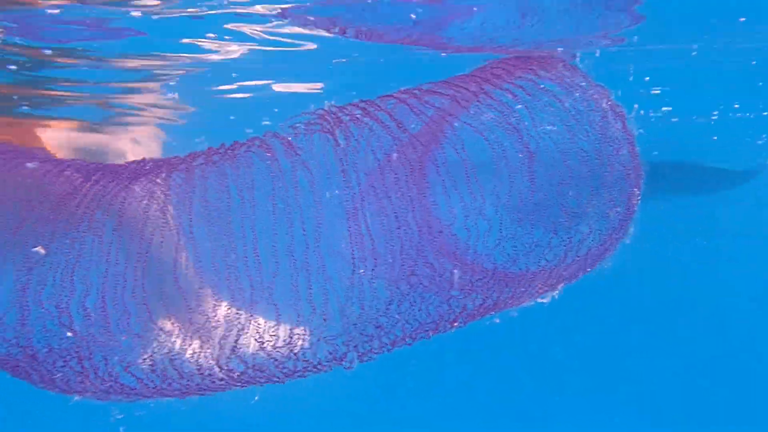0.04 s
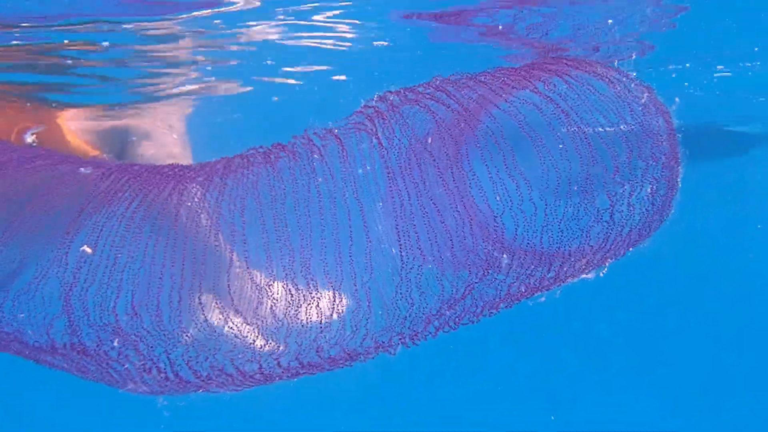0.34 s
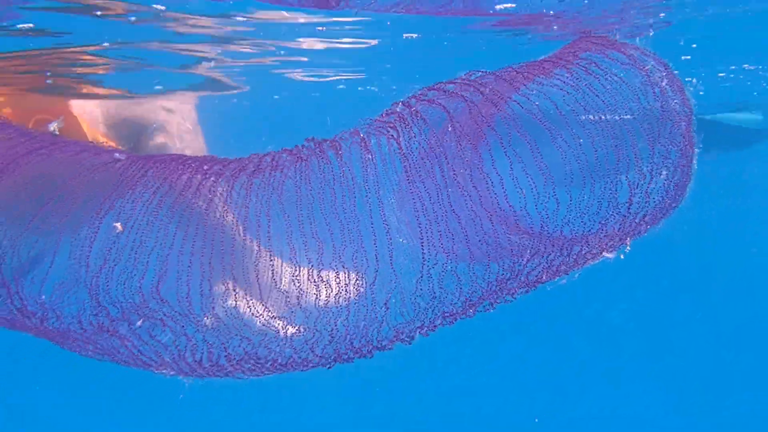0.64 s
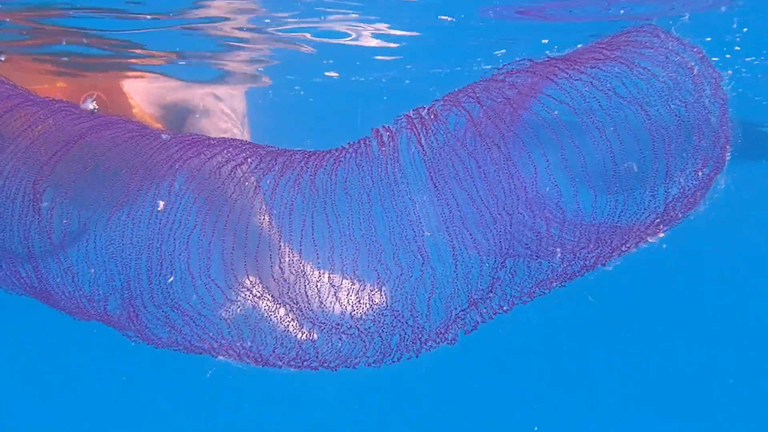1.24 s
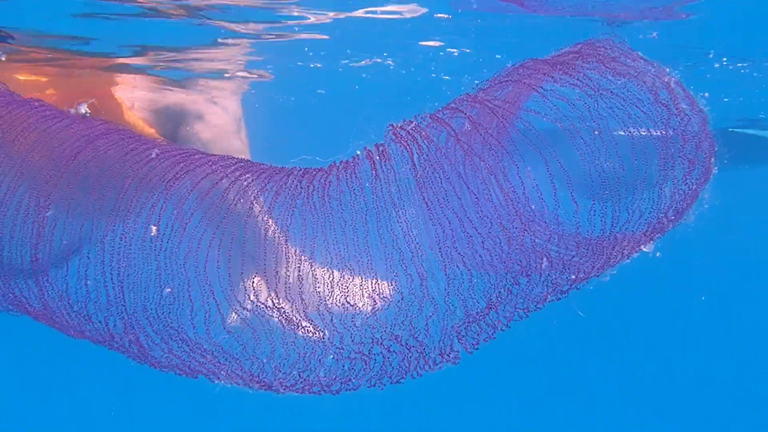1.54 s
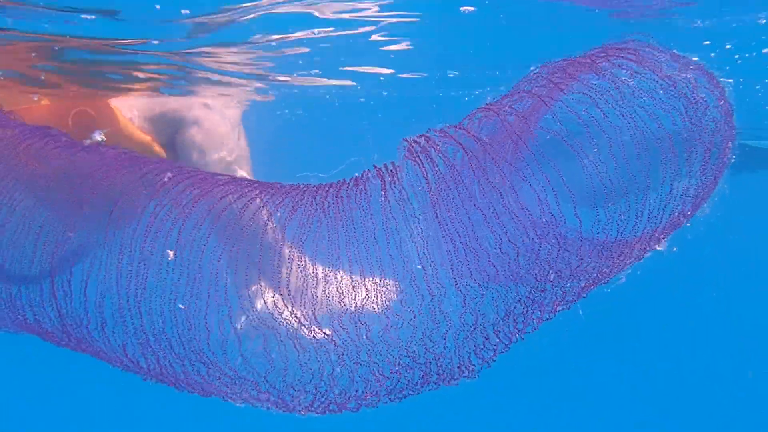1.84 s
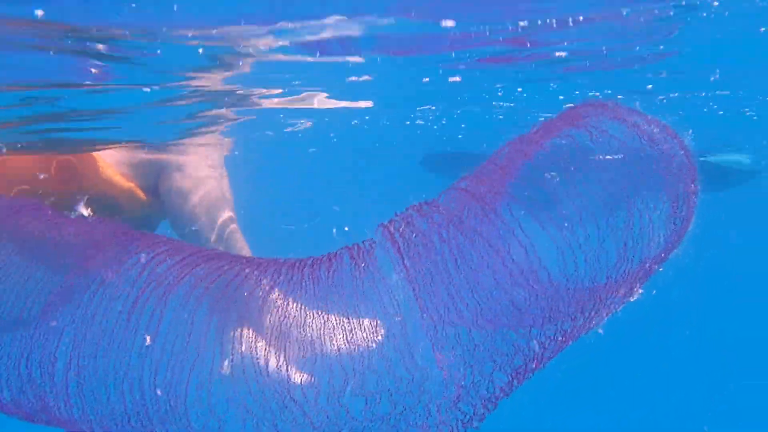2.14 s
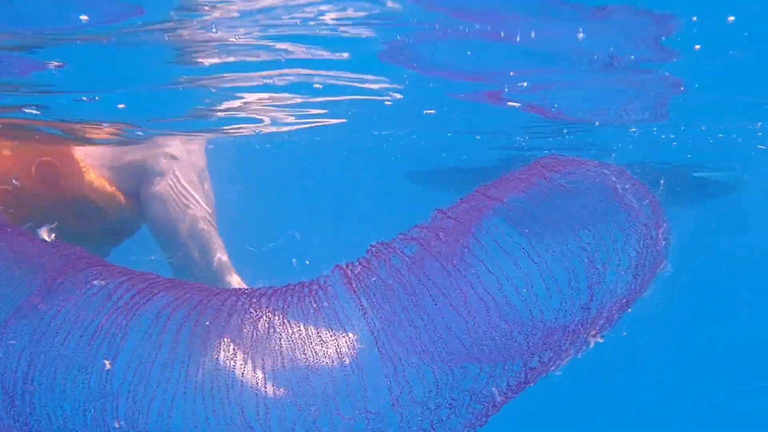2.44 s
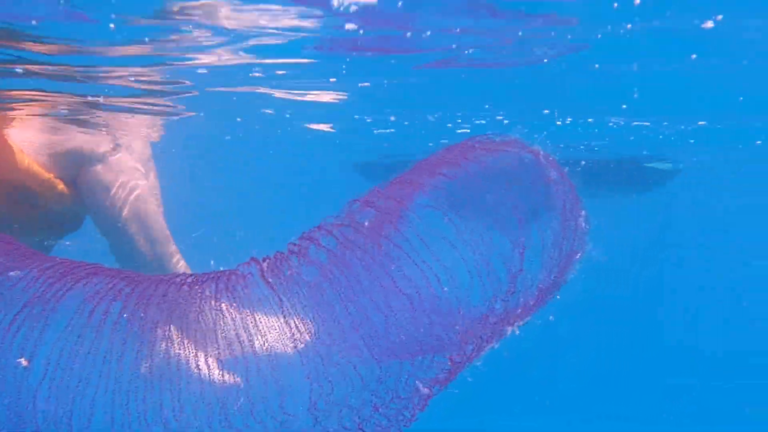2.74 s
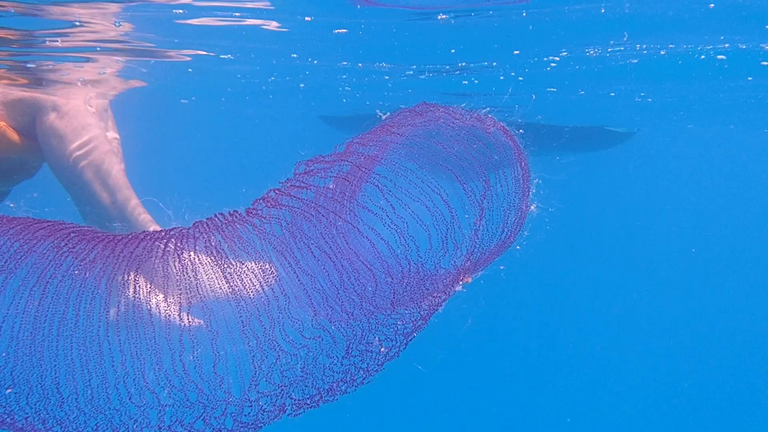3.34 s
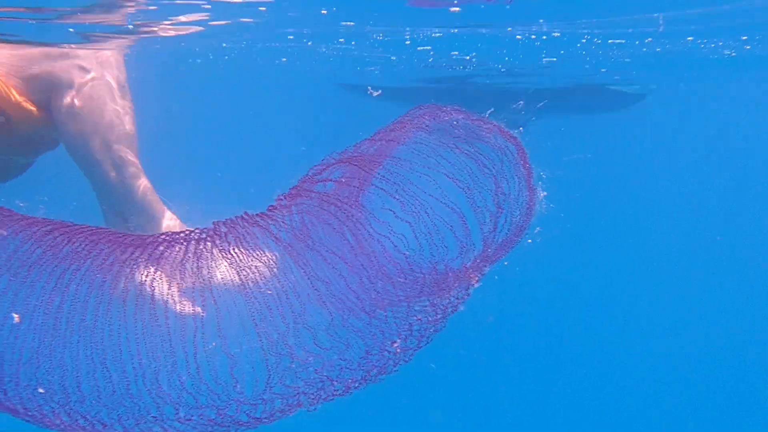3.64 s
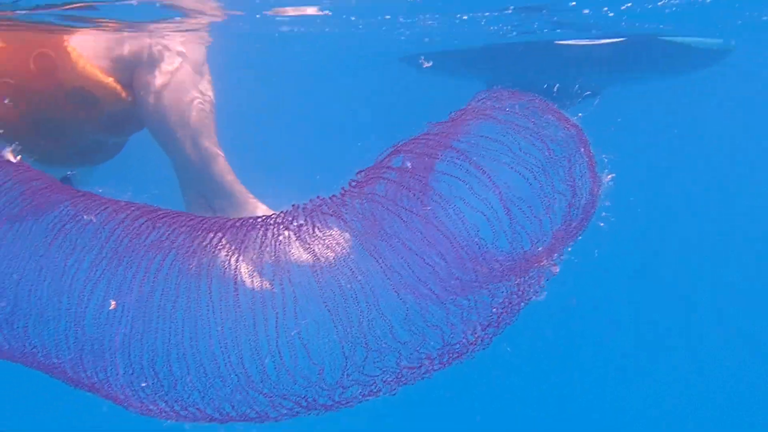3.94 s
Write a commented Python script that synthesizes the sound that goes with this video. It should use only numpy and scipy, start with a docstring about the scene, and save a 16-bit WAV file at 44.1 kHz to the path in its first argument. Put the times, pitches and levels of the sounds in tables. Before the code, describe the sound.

Rapid hollow knocks in an underwater camera housing, over sloshing water and hiss.

```python
"""Hollow knocks, very close, over sloshing water and a steady hiss, just under the sea surface.
The two microphones ride in a camera's waterproof housing. A small stepper motor in the lens, most
likely, twitches up to fifteen times a second, knocking the housing and rasping its gears.
Bubbles glug, air pockets plop and the water pushes on the microphones; shrimp snap near and far."""
import sys
import numpy as np
from scipy import signal
from scipy.fft import rfft, irfft
from scipy.io import wavfile

SR = 44100
rng = np.random.default_rng(int(sys.argv[2]) if len(sys.argv) > 2 else 0)


def store_wav(level_fs):
    """Save 16-bit WAV to argv[1]."""
    pcm = np.round(np.clip(np.atleast_2d(level_fs), -1, 1) * 32767)
    wavfile.write(sys.argv[1], SR, pcm.T.astype(np.int16))


N = 176400

FIRST_TICK_S, TICKS_PER_S, RUN_S = .114, 14.985, .030  # the motor's clock and the length of one run
# Fast motor runs. Each row: start in seconds, levels of the starting and stopping jolts in dB.
FAST_RUNS = [(0.116, -12, -13), (0.185, -14.5, -20), (0.25, -13, -13.5), (0.783, -7, -11),
             (0.982, -34, -14), (1.051, -10, -23), (1.118, -25, -29), (1.184, -14.5, -19.5),
             (1.252, -36, -12), (1.318, -8, -20.5), (1.385, -11, -13.5), (1.451, -10.5, -24),
             (1.52, -19.5, -26), (1.584, -15.5, -19), (1.653, -12.5, -20), (1.717, -15, -11.5),
             (1.784, -24, -12.5), (1.851, -7.5, -18.5), (1.919, -19, -16), (1.985, -15.5, -18),
             (2.051, -32, -14), (2.118, -9.5, -25), (2.187, -16.5, -33), (2.252, -16, -19.5),
             (2.319, -25, -12.5), (2.386, -9.5, -20), (2.855, -17.5, -13.5), (3.854, -8.5, -20.5),
             (3.922, -14.5, -24), (3.988, -28, -20)]
# Slow motor runs. Each row: start in seconds, levels of the first, second and third jolts in dB.
SLOW_RUNS = [(-0.016, -16, -6.5, -15), (0.3198, -8, -10, -18.5), (.3815, -7, -14, -12),
             (0.453, -13, -10.5, -12.5), (.515, -16, -10, -15.5), (0.5877, -12.5, -12, -20),
             (.656, -8, -15, -16), (0.7201, -11, -10.5, -11), (.8525, -13.5, -13.5, -19.5),
             (.9155, -17, -12, -17.5), (2.521, -11, -14, -13), (2.718, -14, -9, -12),
             (2.916, -28, -12.5, -15.5), (2.988, -12, -14, -19.5), (3.1838, -18, -12.5, -14.5),
             (3.2554, -10, -11, -17), (3.3241, -6, -9, -18), (3.3887, -11.5, -9, -11.5),
             (3.4514, -9, -12, -8.5), (3.523, -11, -13, -15.5)]


def amp(db):
    """Decibels to gain."""
    return 10 ** (np.asarray(db) / 20)


def unit(x):
    """Scales to rms 1."""
    return x / np.sqrt(np.mean(x ** 2) + 1e-20)


def add(mix, s, sound):
    """Mixes a sound in at s seconds."""
    at = round(s * SR)
    part, sound = mix[:, max(at, 0):], sound[..., max(-at, 0):]
    part[:, :sound.shape[-1]] += sound[..., :part.shape[1]]


def fader(points):
    """A gain that glides through (seconds, dB) points."""
    return amp(np.interp(np.arange(N) / SR, *np.transpose(points)))


def noise(spectrum, likeness):
    """Stereo noise of rms 1 shaped by (Hz, dB) points; likeness is the power share common to both sides."""
    hz, db = np.transpose(spectrum)
    gain = amp(np.interp(np.log(np.fft.rfftfreq(N, 1 / SR) + 1), np.log(hz), db))
    white = rng.standard_normal((3, N))
    pair = np.sqrt(likeness) * white[2] + np.sqrt(1 - likeness) * white[:2]
    return unit(irfft(rfft(pair) * gain, N))


def ring(hz, rise_s, phase=0):
    """A heavily damped resonance that swells to 1 in the rise time and dies away."""
    t = np.arange(0, 8 * rise_s, 1 / SR)
    envelope = (t / rise_s * np.exp(1 - t / rise_s)) ** 2
    return envelope * np.sin(2 * np.pi * hz * t + phase)


def nearest_tick(s):
    """The time of the motor's clock tick nearest to s seconds."""
    return FIRST_TICK_S + round((s - FIRST_TICK_S) * TICKS_PER_S) / TICKS_PER_S


def jolt(db, stretch=1):
    """The housing's hollow knock, heard from inside; a gentler push (stretch above 1) swells slower."""
    # Housing modes. Each row: pitch in Hz, left and right levels in dB, rise in seconds,
    # phase lead on the left in radians.
    modes = [(393.5, -27.5, -34, 0.0073, -0.4), (586.3, -10.5, -13.5, 0.0058, -0.82),
             (666, -19.5, -1, 0.0038, 0.39)]
    detune, turn = rng.standard_normal(2)
    out = np.zeros((2, SR // 10))
    for k, (hz, left_db, right_db, rise_s, lead) in enumerate(modes):
        phases = np.pi * (turn + k) + np.array([[lead], [0]])
        mode = ring(hz * (1 + .0087 * detune), rise_s * stretch, phases)
        add(out, 0, amp([[db + left_db], [db + right_db]]) * mode)
    return out


def motor_knocks(fast_gap_s=.009, scatter_s=.00079, slow_gap_s=.0105):
    """Fast runs jolt the housing at each end and shiver between; slow runs jolt it three times."""
    out = np.zeros((2, N))
    for s, start_db, stop_db in FAST_RUNS:
        add(out, s, jolt(start_db))
        add(out, nearest_tick(s) + RUN_S, jolt(stop_db))
        for k in (1, 2):
            add(out, s + k * fast_gap_s + scatter_s * rng.standard_normal(), jolt(db=-18))
    for s, *jolts_db in SLOW_RUNS:
        for k, db in enumerate(jolts_db):
            add(out, s + k * slow_gap_s, jolt(db, stretch=1.22))
    return out


def motor_rasp(left_db=-52.5, right_db=-43.5):
    """Right by the microphones the gears rasp through each run, with a thin whine set by its speed."""
    # Gear rasp. Each row: frequency in Hz, relative level in dB.
    spectrum = [(500, -3.5), (1150, -2), (1400, -6.5), (1650, 6.5), (1990, -17), (2130, -6), (2450, -21.5),
                (3100, -18), (4000, -49), (7300, -26.5)]
    fast_whine, slow_whine = [(3427, -66), (6867, -55)], [(6181, -57)]  # pitch in Hz, level in dB
    gate, whine = np.zeros((1, N)), np.zeros((2, N))
    window = signal.windows.tukey(round(RUN_S * SR), .15)
    t = np.arange(len(window)) / SR
    for runs, tones, boost_db in (FAST_RUNS, fast_whine, 0), (SLOW_RUNS, slow_whine, 2):
        for s, *_ in runs:
            add(gate, nearest_tick(s), amp(boost_db) * window)
            for hz, db in tones:
                tone = np.sin(2 * np.pi * (hz * t + rng.random()))
                add(whine, nearest_tick(s), amp(db) * window * tone)
    return gate * amp([[left_db], [right_db]]) * noise(spectrum, likeness=.8) + whine


def gurgle(bubbles_per_s=110, attack_s=.0016, t60_s=.081):
    """Small pockets of air ring briefly, rising a little in pitch."""
    t, out = np.arange(0, .1, 1 / SR), np.zeros(N)
    envelope = (1 - np.exp(-t / attack_s)) * amp(-60 * t / t60_s)
    pitches = np.geomspace(230, 480, num=16)
    for hz in pitches:
        births = (rng.random(N) < bubbles_per_s / len(pitches) / SR) * rng.uniform(.22, 1, N)
        bubble = envelope * np.sin(2 * np.pi * hz * t * (1 + 2.17 * t))
        out += signal.oaconvolve(births, bubble)[:N]
    return unit(out)


def slosh():
    """Water sloshes and gurgles around the housing, reaching both microphones almost alike."""
    # Tone of the slosh. Each row: frequency in Hz, relative level in dB.
    spectrum = [(80, -33), (170, -9), (270, 4.5), (330, -2.5), (420, 11), (510, -4), (650, -1), (800, -16),
                (1400, -40.5), (3200, -56), (4500, -77)]
    # Its swells. Each row: time in seconds, level in dB.
    swells = [(.35, -31), (.68, -26.5), (.84, -22.5), (1.06, -27.5), (1.35, -31), (1.42, -48), (1.5, -31),
              (1.66, -25), (2, -28), (2.15, -38), (2.52, -32), (2.76, -32.5), (2.86, -44), (3.65, -44.5),
              (3.76, -40.5)]
    water = noise(spectrum, likeness=1) + amp(-2) * gurgle()
    return fader(swells) * water * amp([[-.7], [.7]])


def flow_rumble():
    """Flow rumbles on each microphone, largely separately."""
    # Tone of the rumble. Each row: frequency in Hz, relative level in dB.
    spectrum = [(15, -33.5), (38, 3.5), (60, 5.5), (115, -4), (170, -8.5), (550, -73)]
    # Surges of the flow. Each row: time in seconds, level in dB.
    surges = [(.2, -53), (.35, -40), (.68, -39.5), (.78, -24), (.95, -24), (1.26, -30.5), (1.4, -40.5),
              (1.6, -41), (1.68, -28), (2.26, -39.5), (3.1, -40.5), (3.85, -49.5)]
    return amp(5) * fader(surges) * noise(spectrum, likeness=.31)


def hiss(db=-45.5):
    """A steady, wide hiss lies behind everything."""
    # Tone of the hiss. Each row: frequency in Hz, relative level in dB.
    spectrum = [(160, 13.5), (620, 17), (1100, -3), (3200, -9), (4050, -17.5), (4800, -13), (5600, -1.5),
                (6400, -3.5), (7400, 1.5), (8400, 0.5), (9300, -8), (16000, -8.5)]
    return amp(db) * noise(spectrum, likeness=.017)


def glugs(rise_cycles=3.06):
    """Large bubbles ring low, dead centre."""
    # Each row: start in seconds, level in dB, pitch in Hz.
    bubbles = [(0.139, -17.5, 251), (1.046, -17, 335), (1.61, -13, 370), (1.676, -18.5, 313),
               (1.735, -16.5, 389), (1.764, -17.5, 428), (1.9, -18.5, 410)]
    out = np.zeros((2, N))
    for s, db, hz in bubbles:
        add(out, s, amp(db) * ring(hz, rise_cycles / hz))
    return out


def shrimp(far_per_s=45, far_db=-48.5):
    """A few near snaps off to the left and many far ones on both sides ping the housing."""
    # Near snaps. Each row: start in seconds, level in dB.
    snaps = [(0.219, -30), (0.4667, -29.5), (1.0635, -38), (1.5074, -33), (1.7447, -23.5), (2.1196, -38),
             (2.8054, -24.5), (2.983, -39), (3.4661, -26), (3.6668, -18), (3.9214, -29.5), (3.978, -34)]
    # Ring of a snap. Each row: pitch in Hz, level in dB, rise in seconds.
    modes = [(5605, -10.5, 0.00091), (7430, 4, 0.00032), (11000, -17.5, 0.000049)]
    # The direct sound and two echoes. Each row: delay in seconds, gain in dB.
    paths = [(0, -2), (.0019, -14), (.0083, -14.5)]
    clicks, ping, out = np.zeros((2, N)), np.zeros((1, SR // 50)), np.zeros((2, N))
    for s, db in snaps:
        add(clicks, s, amp([[db + 5], [db - 4.5]]))
    far_clicks = rng.random((2, N)) < far_per_s / SR
    spread_db = 3.65 * np.minimum(rng.exponential(1, (2, N)), 3)
    clicks += far_clicks * amp(far_db + spread_db)
    for hz, db, rise_s in modes:
        add(ping, 0, amp(db) * ring(hz, rise_s))
    pings = signal.oaconvolve(clicks, ping, axes=1)[:, :N]
    for delay_s, db in paths:
        add(out, delay_s, amp(db) * pings)
    return out


def spatter():
    """Fine spatter comes and goes, a little right of centre."""
    # Tone of the spatter. Each row: frequency in Hz, relative level in dB.
    spectrum = [(600, -19), (900, 6.5), (1150, 0), (2000, -19), (4500, -40.5)]
    # Its flurries. Each row: time in seconds, level in dB.
    flurries = [(.62, -52), (.74, -44.5), (.8, -35.5), (.86, -52.5), (1.5, -55.5), (1.8, -44), (2.1, -54)]
    return fader(flurries) * noise(spectrum, likeness=.86) * amp([[-3], [2]])


def plops(rise_s=.0012, tick_hz=3080):
    """Air pockets burst at the housing, toward the right, each with a faint, sharp tick."""
    # Each row: start in seconds, level on the right in dB, pitch in Hz.
    bursts = [(0.681, -17, 950), (.765, -18, 1020), (0.783, -20, 970), (0.793, -20, 1090), (.801, -8, 820),
              (0.8136, -11, 1050), (0.823, -13.5, 856)]
    out = np.zeros((2, N))
    for s, db, hz in bursts:
        add(out, s, amp([[db - 6.5], [db]]) * ring(hz, rise_s))
        add(out, s, amp(db - 35) * ring(tick_hz, rise_s / 2))
    return out


def thumps(rise_cycles=.705, far_side_db=-23.5):
    """Water pushes on one microphone with a deep thump that barely reaches the other."""
    # Each row: time of the peak in seconds, level in dB, pitch in Hz, side pushed.
    pushes = [(0.791, -9.5, 54, "left"), (0.845, -8.5, 70, "left"), (.889, -7.5, 77, "left"),
              (.907, -3, 92, "right"), (.943, -10, 75, "right"), (1.027, -7.5, 70, "left"),
              (1.073, -3.5, 66, "left"), (1.095, -4, 86, "left"), (1.149, -4, 65, "right"),
              (1.648, -11.5, 65, "right"), (1.848, -4, 49, "right"), (2.008, -7.5, 57, "left"),
              (2.228, -15.5, 86, "left"), (2.485, -11, 52.6, "right"), (3.977, -16, 59.6, "left")]
    out = np.zeros((2, N))
    for s, db, hz, side in pushes:
        rise_s = rise_cycles / hz
        near_far = amp([[db], [db + far_side_db]])
        gains = near_far if side == "left" else near_far[::-1]
        add(out, s - rise_s, gains * ring(hz, rise_s))
    return out


def scene():
    """Motor, water, shrimp and hiss, all heard from the housing."""
    motor = motor_knocks() + motor_rasp()
    water = slosh() + flow_rumble() + glugs() + spatter() + plops() + thumps()
    return motor + water + shrimp() + hiss()


def record(dry):
    """Sound reaches the left microphone slightly later; the ends fade and the top treble is cut."""
    lag_s, fade_s, cutoff_hz = 6.8e-5, .004, 16200
    mics = np.array([np.roll(dry[0], round(lag_s * SR)), dry[1]])
    fades = signal.windows.tukey(N, 2 * fade_s * SR / N)
    lowpass = signal.firwin(511, cutoff_hz, window=("kaiser", 9), fs=SR)
    return signal.oaconvolve(mics * fades, lowpass[None], "same")


dry = scene()
out = record(dry)
store_wav(out)
```